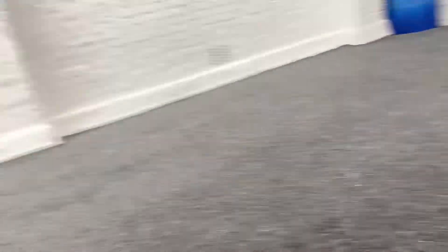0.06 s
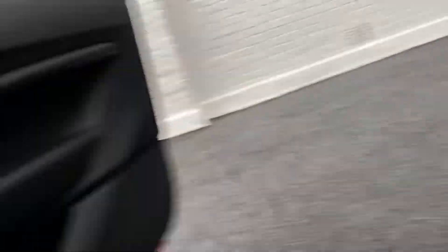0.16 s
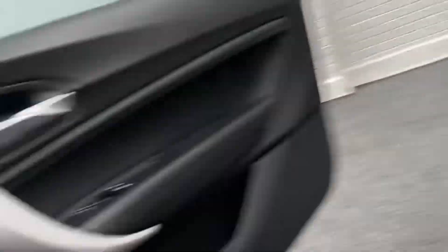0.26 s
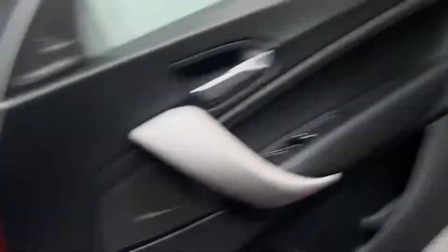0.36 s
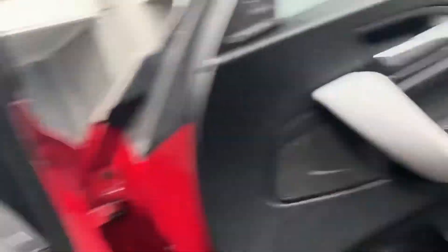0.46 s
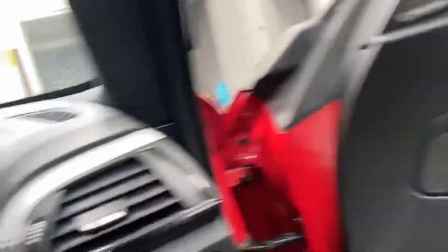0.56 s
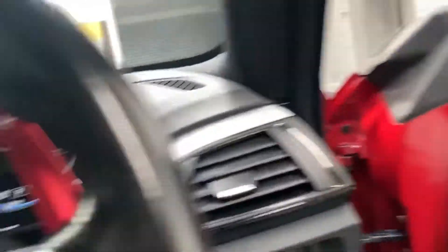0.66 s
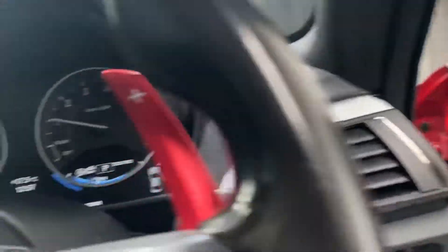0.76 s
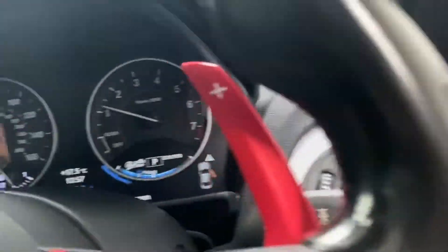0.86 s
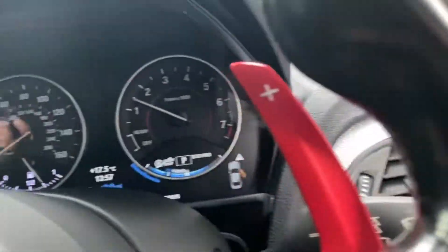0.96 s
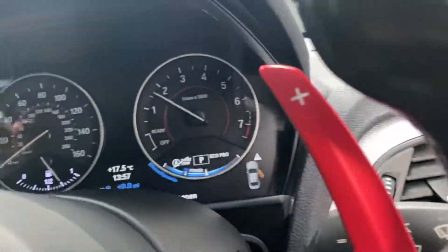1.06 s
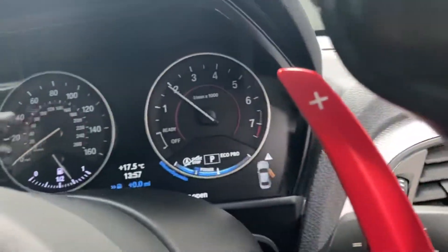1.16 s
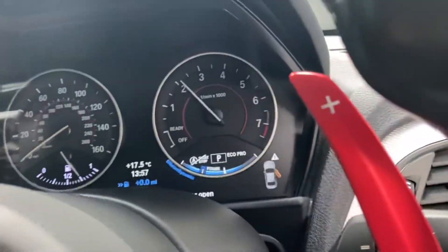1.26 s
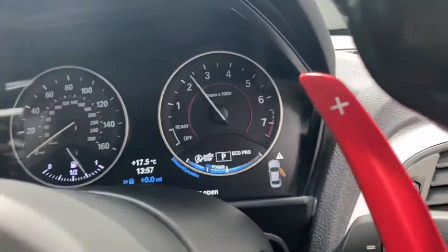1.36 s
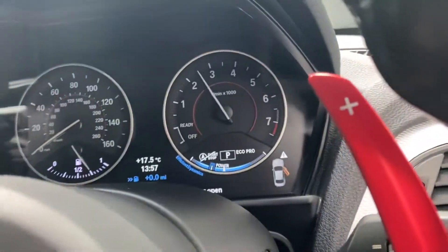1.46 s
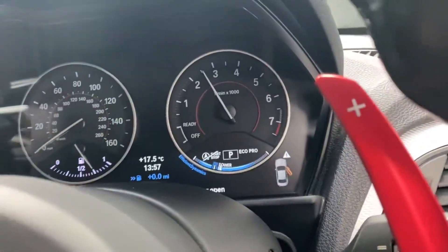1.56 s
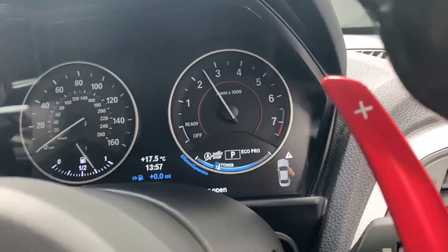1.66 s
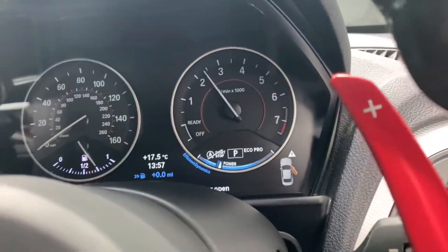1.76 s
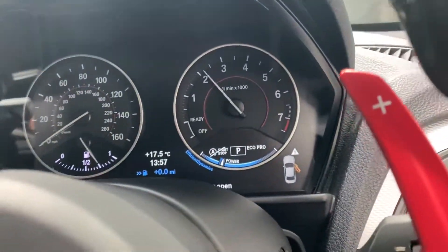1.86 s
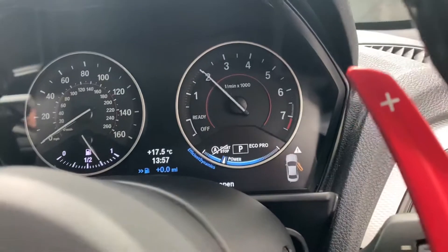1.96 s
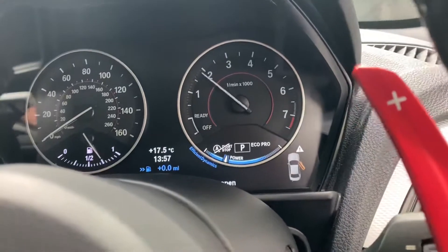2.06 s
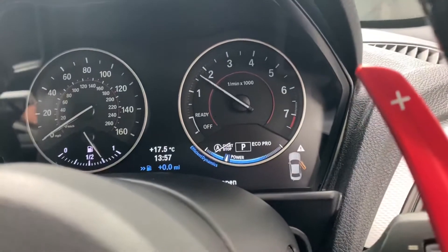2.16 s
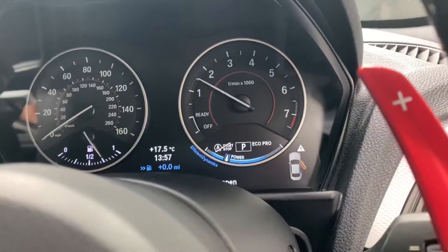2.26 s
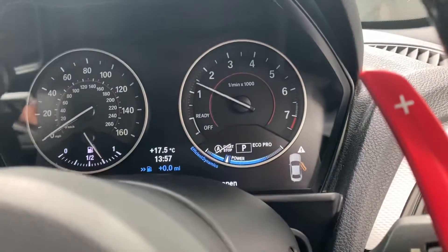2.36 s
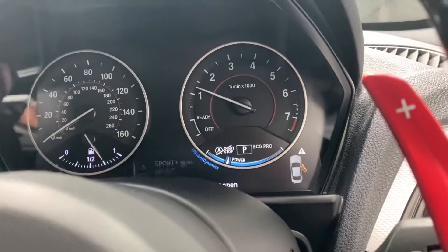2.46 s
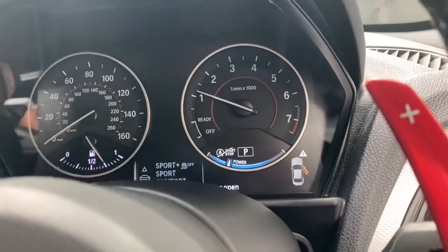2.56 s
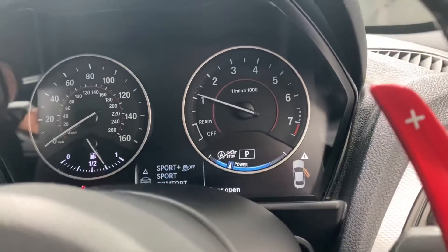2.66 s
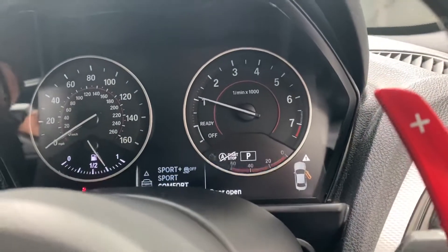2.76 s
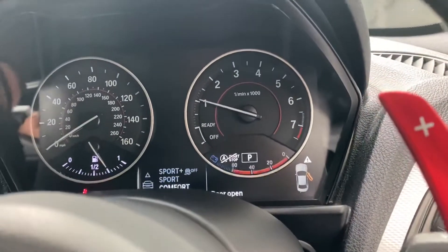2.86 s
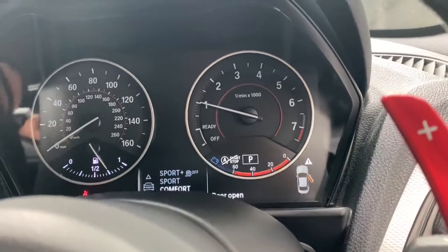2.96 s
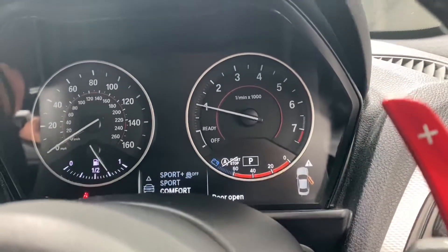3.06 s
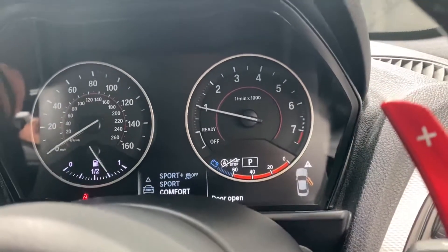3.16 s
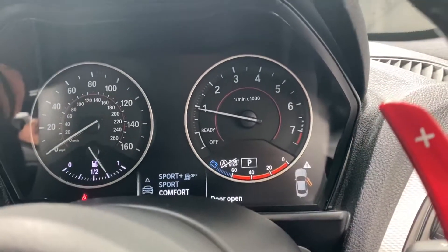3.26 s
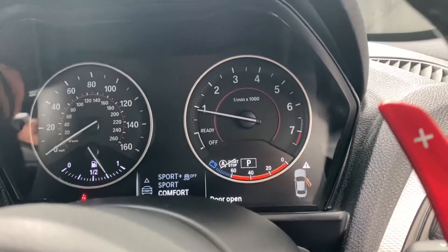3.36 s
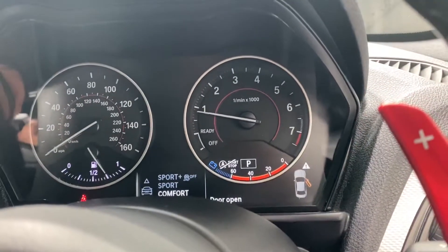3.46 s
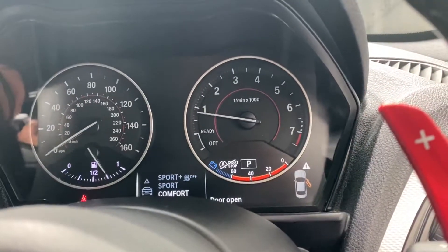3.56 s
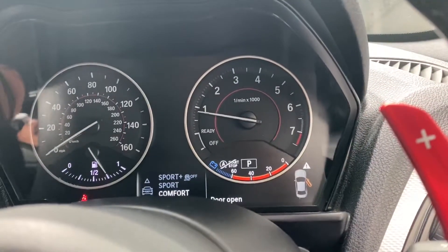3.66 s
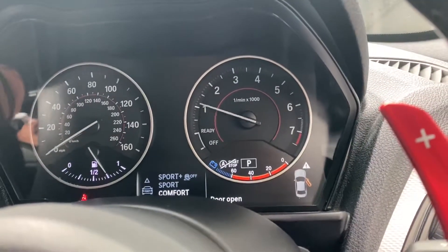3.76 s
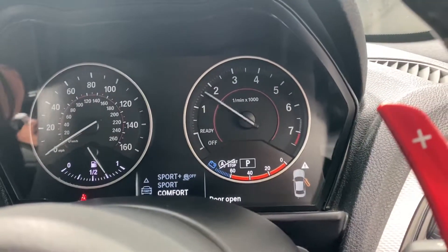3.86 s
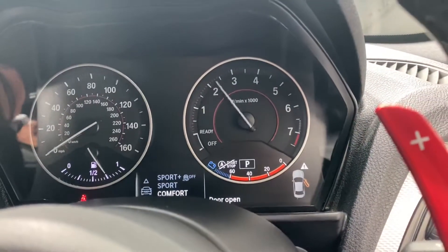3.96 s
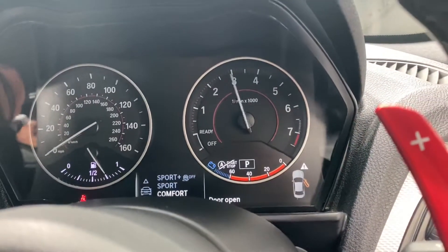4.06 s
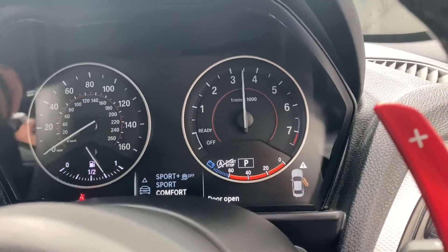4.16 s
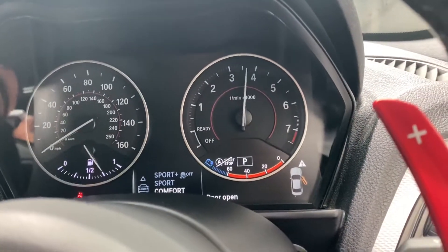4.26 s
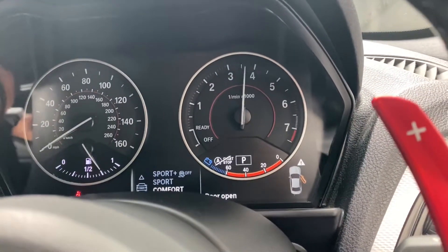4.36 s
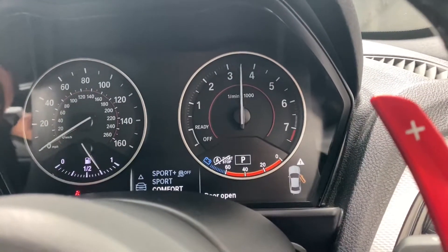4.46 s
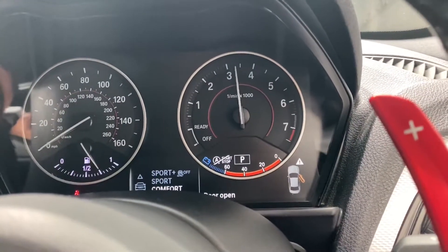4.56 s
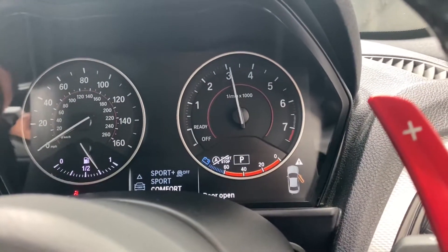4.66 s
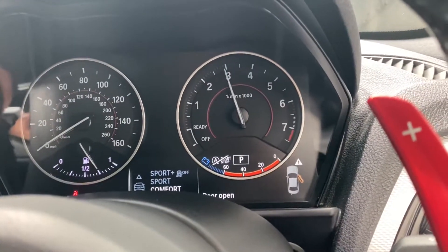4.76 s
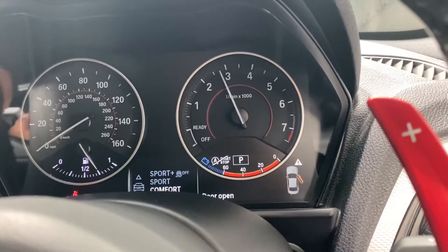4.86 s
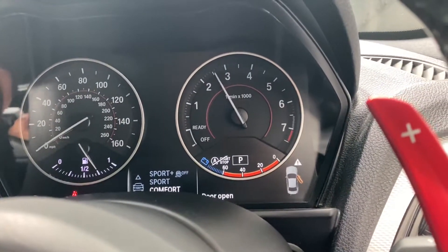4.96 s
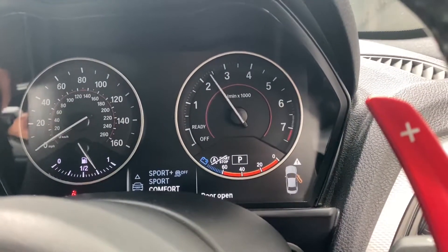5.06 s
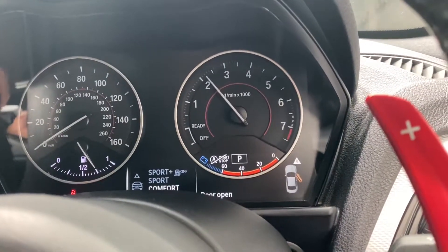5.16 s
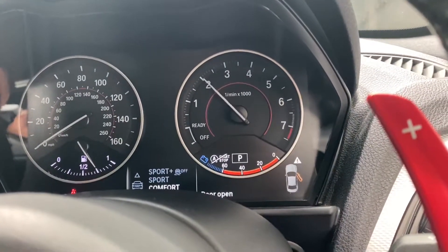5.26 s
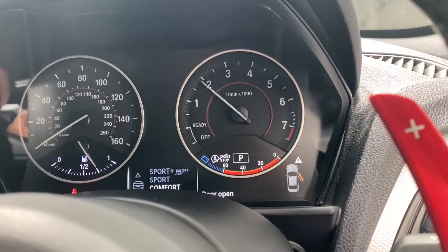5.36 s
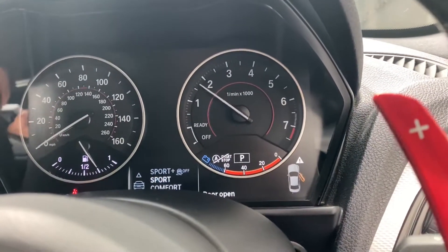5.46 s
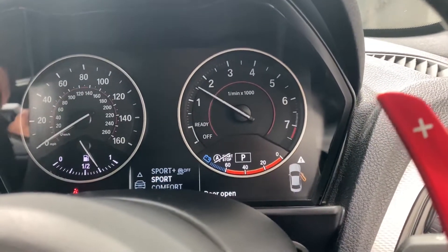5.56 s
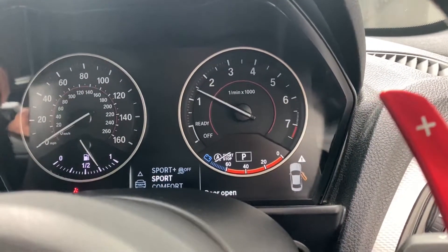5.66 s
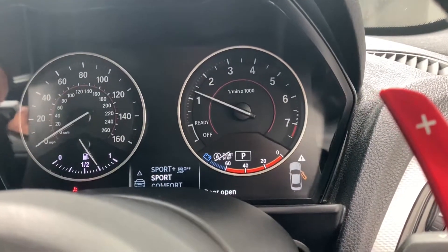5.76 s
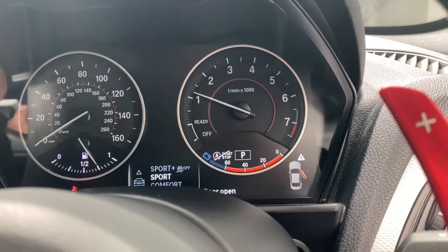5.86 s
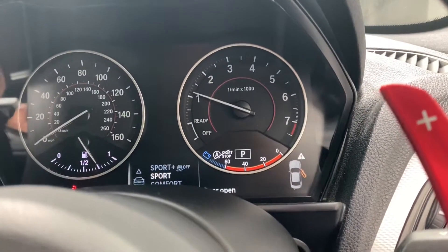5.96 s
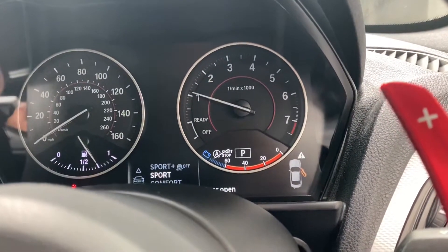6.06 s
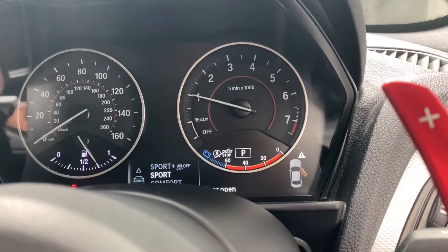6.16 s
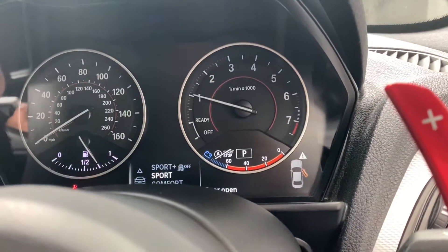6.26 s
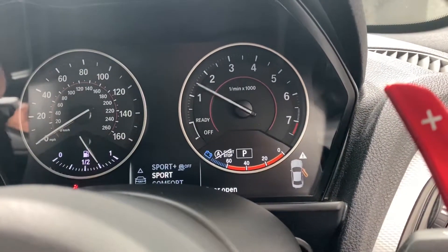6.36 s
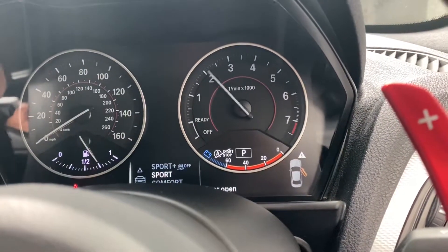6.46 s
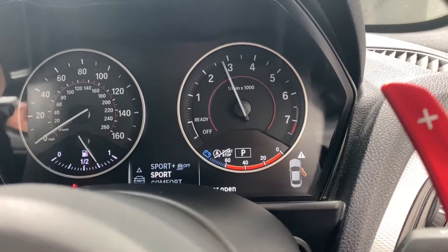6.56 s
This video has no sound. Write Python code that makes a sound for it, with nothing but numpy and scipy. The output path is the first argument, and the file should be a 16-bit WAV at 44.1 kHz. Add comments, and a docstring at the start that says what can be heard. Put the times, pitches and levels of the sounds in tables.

```python
"""A turbocharged six-cylinder car in a hard-walled showroom, heard from the driver's seat with the door open.
It sinks from a rev, swells again and falls back with a whine and a whirr that follow the engine; a switch ticks.
The hardest stab at the pedal brings rasp, hiss and vented air, then unburnt fuel cracks and burbles in the pipe.
A last stab is still climbing at the end. Firing pulses ring a bank of resonances; filtered noise makes the rest,
with echoes from the walls and a steady rumble beneath."""
import sys
import numpy as np
from scipy import signal
from scipy.fft import rfft, irfft, next_fast_len
from scipy.io import wavfile

SR = 44100
rng = np.random.default_rng(int(sys.argv[2]) if len(sys.argv) > 2 else 0)


def transcribe(signal):
    """Save signal, clipped to [-1, 1], as a 16-bit WAV file at the path in sys.argv[1]."""
    frames = np.atleast_2d(signal).T
    limited = np.clip(frames, -1, 1)
    pcm = np.round(limited * 32767).astype(np.int16)
    wavfile.write(sys.argv[1], SR, pcm)


N = 291362
TIME = np.arange(N) / SR  # s

# resonances of exhaust pipe and cabin: centre_hz, width_hz (before widening), relative_level_db
PIPE = [(54.6, 13.4, 6), (82.2, 27.5, 5), (123.6, 33.3, 0.5), (175.1, 24.4, 3.5), (209.2, 13.3, 4),
        (252, 5.6, 0.5), (288.9, 11.6, 5), (326.9, 10.3, 2), (359.4, 12.9, 2.5), (437, 14.5, -5.5),
        (504.5, 16, -1.5), (560.5, 33.4, -3), (682, 80, -5), (746.4, 83, -5.5), (832, 44, -7),
        (916.3, 29, -4)]
# resonances of the rasping tailpipe: centre_hz, width_hz (before widening), relative_level_db
RASP = [(686, 29, -0.5), (734.4, 27, 1.5), (785.6, 45, -6), (920, 41, -8), (1022, 37, -10.5)]
# sound that differs between the ears, against what they share: frequency_hz, level_db
APART = [(100, -2), (400, -4.5), (1000, 1.5), (3000, 5), (9000, 15.5), (13000, -19.5)]

ROAR_DB = -30  # roar at which whirr and hiss have their reference levels
RASP_HZ = 181  # reference speed of rasp and half order, firings per s
RUSH_LAG_S = 0.044  # hiss and rasp build up later than the note


def gain_of(db):
    """Turns decibels into an amplitude factor."""
    return 10 ** (np.asarray(db) / 20)


def evened(x):
    """Scales a signal to rms 1."""
    return x / np.sqrt(np.mean(x ** 2) + 1e-20)


def read(points, hz):
    """Reads a curve drawn over log frequency."""
    f, value = np.transpose(points)
    return np.interp(np.log(hz + 1), np.log(f + 1), value)


def colour(x, points):
    """Filters by a spectrum in dB."""
    size = next_fast_len(x.shape[-1] + 4096)
    gains = gain_of(read(points, np.fft.rfftfreq(size, 1 / SR)))
    return irfft(rfft(x, size) * gains, size)[..., :x.shape[-1]]


def pipe(x, widen, modes=PIPE):
    """Rings a bank of resonances, each applied twice for steep sides."""
    out = np.zeros(len(x))
    for hz, width, db in modes:
        b, a = signal.iirpeak(hz, hz / (width * widen), SR)
        once = signal.lfilter(b, a, x)
        out += gain_of(db) * signal.lfilter(b, a, once)
    return out


def wander(hz):
    """Chance drift below hz, rms 1."""
    slow = signal.butter(2, hz, fs=SR, output="sos")
    return evened(signal.sosfilt(slow, rng.standard_normal(N)))


def whistle(hz, width_hz):
    """Noise in a narrow, steep band that follows the curve hz, rms 1."""
    pole = [1, -np.exp(-2 * np.pi * width_hz / SR)]
    once = signal.lfilter([1], pole, rng.standard_normal((2, N)))
    slow = signal.lfilter([1], pole, once)
    carrier = np.exp(2j * np.pi * np.cumsum(hz) / SR)
    return evened(((slow[0] + 1j * slow[1]) * carrier).real)


def room(x):
    """Sparse echoes of random sign, each band dying at its own speed; one tail is shared, two differ by ear."""
    # decay of the showroom: frequency_hz, t60_s
    decay = [(100, 0.84), (700, 1.08), (2000, 1.75), (5000, 1), (12000, 0.27)]
    # room over direct sound: frequency_hz, level_db
    wet = [(60, -9.5), (300, -2.5), (1000, -2), (3000, -3), (8000, -14), (15000, -5.5)]
    taps = np.zeros((3, SR))
    at = np.arange(300, SR - 20, 20) + rng.integers(0, 20, (3, (SR - 301) // 20))
    np.put_along_axis(taps, at, rng.choice([-1., 1.], at.shape), 1)
    hz, t, z = signal.stft(taps, SR, nperseg=256)
    t60 = read(decay, hz)[:, None]
    # the root keeps the energy of each band independent of its decay
    tail = signal.istft(z * gain_of(-60 * t / t60) / np.sqrt(t60), SR, nperseg=256)[1]
    tail /= np.linalg.norm(tail[0])
    tail = colour(tail[0] + colour(tail[1:], APART), wet)
    return signal.fftconvolve(x[None], tail, axes=1)[:, :N]


def idle_rumble():
    """Steady low noise, part shared and part different at the two ears."""
    # spectrum of the rumble: frequency_hz, relative_level_db (per Hz)
    spectrum = [(15, -35), (25, 1), (80, 3), (280, -2.5), (400, -30), (906, -11), (1480, -26), (1650, -20),
                (12000, -76.5), (15600, -102)]
    shared, apart = rng.standard_normal(N), rng.standard_normal((2, N))
    return gain_of(-45) * evened(colour(shared + colour(apart, APART), spectrum))


def ticks():
    """Short bright clicks of plastic switches in the cabin: dying bursts of noise."""
    # small switch ticks: start_s, level_db (before colouring)
    clicks = [(2.2502, -32), (2.4113, -24), (2.4178, -33), (5.1269, -23)]
    t60_s = 0.037
    out, t = np.zeros(N), np.arange(2000) / SR
    for (s, db), noise in zip(clicks, rng.standard_normal((len(clicks), len(t)))):
        out[round(s * SR):][:len(t)] += gain_of(db - 60 * t / t60_s) * noise
    return colour(out, [(2000, -30), (4000, -10), (11000, -23.5), (15000, -34)])  # Hz, dB


def burble():
    """Small pops of unburnt fuel while the engine slows: impulses at an uneven rate and of uneven strength."""
    # strength of the pops over time: time_s, level_db (before pipe and body)
    strength = [(4.55, -32), (4.66, -13), (4.73, -13.5), (4.79, -28.5), (5.0, -32), (5.1, -14.5),
                (5.17, -34), (5.32, -16.5), (5.42, -43), (5.6, -23.5), (5.8, -43)]
    s, db = np.transpose(strength)
    pop_db = np.interp(TIME, s, db, -150, -150) + 2.5 * rng.standard_normal(N)
    pops_per_s = 50 * gain_of(4 * wander(hz=39.5))
    struck = np.diff(np.floor(np.cumsum(pops_per_s) / SR), prepend=0)
    return gain_of(pop_db) * struck


def backfires():
    """A pressure thump rings pipe and body; the crack arrives later, round the car."""
    # fuel going off in the pipe: start_s, thump_db (before pipe and body), crack_db
    bangs = [(0.189, -25, -66), (0.238, -19.5, -88), (4.183, -21, -43), (4.479, -0.5, -11),
             (4.4933, -10, -17.5), (4.511, -17, -22), (4.692, -16, -31), (4.716, -18.5, -33),
             (4.823, -24, -43), (4.901, -26, -47), (5.065, -16, -50), (5.135, -17, -48), (5.304, -17, -55),
             (5.378, -24.5, -59), (5.568, -18.5, -64)]
    # spectrum of the crack: frequency_hz, relative_level_db (per Hz)
    crack_spectrum = [(290, -12), (500, 5.5), (686, 2), (900, -7), (1200, -3.5), (1580, 0.5), (1930, -16.5),
                      (2250, -6.5), (2580, -15), (2950, -8.5), (4700, -18.5), (5050, -16), (6650, -17.5),
                      (7100, -26), (11700, -31.5), (15600, -45)]
    crack_delay_s, crack_t60_s = .0105, 0.16
    blows, cracks, t = np.zeros(N), np.zeros(N), np.arange(4000) / SR
    fade = gain_of(-60 * t / crack_t60_s)
    noise = rng.standard_normal((len(bangs), len(t)))
    for (s, thump_db, crack_db), row in zip(bangs, noise):
        blows[round(s * SR)] += gain_of(thump_db)
        at = round((s + crack_delay_s) * SR)
        cracks[at:at + len(t)] += gain_of(crack_db) * fade * np.minimum(t / .003, 1) * row
    pops = burble()
    # each small pop spits a little noise
    spit = gain_of(-30) * fade * rng.standard_normal(len(t))
    cracks += signal.oaconvolve(pops, spit)[:N]
    # the cabin flexes at 98 Hz, 1.5 ms after the blow
    surge = -np.sin(2 * np.pi * 98 * (t - .0015)) * gain_of(-60 * t / .055) * (t > .0015)
    u = t / .00025  # time in units of the pressure rise
    ring = pipe((1 - u) * np.exp(-u), widen=4.0, modes=PIPE + RASP)
    puff = 0.66 * u * np.exp(1 - u) + 5.0 * ring
    thumps = signal.oaconvolve(blows + pops, puff) + signal.oaconvolve(blows + 0.049 * pops, surge)
    # thumps are heard through the body
    muffled = signal.sosfilt(signal.butter(2, 1800, fs=SR, output="sos"), thumps[:N])
    return muffled + colour(cracks, crack_spectrum) / np.std(colour(noise, crack_spectrum))


def pedal(t):
    """Decibels that the open throttle adds to boom, growl, hiss and rasp."""
    # stabs at the pedal: press_s, rise_s, lift_s, boom_db, growl_db, hiss_db, rasp_db
    stabs = [(-.5, .1, 0.02, 12, 2, -0.5, 25.5), (.6, 0.098, 1.3, 6, 5.5, 6.5, 2),
             (3.559, 0.085, 4.07, 16, 11, 12.5, 9), (6.139, 0.049, 6.47, 14, 9, 11.5, 8)]
    lift_fade_s = 0.11
    added = 0
    for press, rise, lift, *adds_db in stabs:
        opening = np.minimum((t - press) / rise, 1 - (t - lift) / lift_fade_s)
        added = added + np.outer(adds_db, np.clip(opening, 0, 1))
    return added


def fuel_cut(t):
    """Decibels that the clean note loses while no fuel burns on the overrun."""
    # spells without fuel: start_s, end_s, change_db
    spells = [(1.39, 1.64, -12), (4.44, 5.6, -8)]
    fade_s = .05
    return sum(db * np.clip(np.minimum(t - start, end - t) / fade_s, 0, 1) for start, end, db in spells)


def whirr(roar_db):
    """Steady-textured noise whose level follows the roar."""
    # spectrum of the whirr: frequency_hz, relative_level_db (per Hz)
    spectrum = [(590, -30), (1000, 11), (2280, -2.5), (2530, -7.5), (2990, -9.5), (3880, -17),
                (6000, -14.5), (7800, -61.5)]
    level_db = -41 + 0.98 * (roar_db - ROAR_DB)
    return evened(colour(rng.standard_normal(N), spectrum)) * gain_of(level_db)


def whine():
    """Belt drive whine: a gliding noise band, thin near idle and broad under load."""
    # course of the whine, silent after the last row: time_s, centre_hz, thin_db, broad_db
    course = [(0, 2422, -101, -53), (0.751, 2008, -57.5, -69), (1.249, 2679, -61, -52),
              (2.2, 2408, -65, -62.5), (2.699, 2079, -58.5, -68), (3.049, 1895, -56, -72),
              (3.251, 1817, -76, -82), (3.601, 1757, -69, -78)]
    s, centre_hz, thin_db, broad_db = np.transpose(course)
    hz = np.interp(TIME, s, centre_hz)
    thin = whistle(hz, width_hz=110) * gain_of(np.interp(TIME, s, thin_db, right=-150))
    broad = whistle(hz, width_hz=450) * gain_of(np.interp(TIME, s, broad_db, right=-150))
    return thin + broad


def vent():
    """Air vented as the turbo slows: a falling band of noise."""
    # course of the vented air: time_s, centre_hz, level_db
    course = [(4.104, 7190, -57), (4.299, 6449, -50), (4.468, 6000, -45), (4.701, 5577, -56)]
    s, hz, db = np.transpose(course)
    return whistle(np.interp(TIME, s, hz), width_hz=350) * gain_of(np.interp(TIME, s, db, -150, -150))


def hiss(puffs, roar_db):
    """Turbulent gas puffs coloured to a hiss that follows the roar and the open throttle."""
    # spectrum of the hiss: frequency_hz, relative_level_db (per Hz)
    spectrum = [(590, -22), (1080, -2.5), (1290, -2.5), (1500, -37), (2290, -18.5), (3080, -17),
                (4300, -23.5), (5500, -20.5), (6220, -18), (7390, -28), (10800, -33.5), (15600, -55.5)]
    level_db = -52 + 0.84 * (roar_db - ROAR_DB) + pedal(TIME - RUSH_LAG_S)[2]
    return evened(colour(puffs, spectrum)) * gain_of(level_db + 0.64 * wander(hz=6.6))


def muffle(x, filt=signal.sosfilt):
    """The silencer: keeps what lies below 420 Hz."""
    return filt(signal.butter(4, 420, fs=SR, output="sos"), x)


def uneven_roar(hz, firings, puffs, roar_db):
    """Firings of unequal strength and gas puffs ring the pipe, and the tailpipe rasps more as speed climbs."""
    even_hz, even_db = 270, 58  # speed, or added boom, at which the firings are fully even
    fill_s = .05  # the roar in the pipe trails the gas flow
    keep = np.exp(-1 / (fill_s * SR))
    filled_db = roar_db[0] + signal.lfilter([1 - keep], [1, -keep], roar_db - roar_db[0])
    # rasp against the roar: -8.5 dB at RASP_HZ, 11 dB more for each doubling of speed
    rasp_db = filled_db - 8.5 + 11 * np.log2(hz / RASP_HZ)
    rasp_db += pedal(TIME - RUSH_LAG_S)[3] + fuel_cut(TIME) / 2
    fired = np.diff(np.floor(firings), prepend=0) * rng.standard_normal(N)
    kicks = evened(signal.lfilter([1], [1, -.85], fired) / np.sqrt(hz))
    drive = 0.61 * kicks + 0.98 * evened(puffs)
    # at speed and under load the firings even out, so their roughness leaves the bass
    evenness = np.clip(hz / even_hz + pedal(TIME)[0] / even_db, 0, 1)
    drive -= evenness * muffle(drive, signal.sosfiltfilt)
    high_orders = sum(np.cos(2 * np.pi * k * firings) for k in range(4, 9))
    roar = evened(pipe(drive, widen=1.57)) * gain_of(filled_db + 2 * wander(hz=23.2))
    rasp = evened(pipe(drive + 0.93 * high_orders, widen=1.06, modes=RASP))
    return roar + rasp * gain_of(rasp_db + 2 * wander(hz=30))


def exhaust_note(hz, firings):
    """Equal firings give a boom and its orders; small cylinder differences give weak half orders."""
    # boom by speed with the pedal up: firings_per_s, level_db (before the pipe)
    boom_curve = [(40, -44), (53, -39.5), (88, -31), (115, -35), (145, -31), (175, -21)]
    # growl by speed with the pedal up: firings_per_s, level_db (before silencer and pipe)
    growl_curve = [(40, -44), (50, -45.5), (65, -36), (90, -26.5), (115, -26), (150, -25), (180, -17.5)]
    growl_lead_s = 0.043  # the growl catches before the boom
    boom_db = read(boom_curve, hz) + pedal(TIME)[0] + fuel_cut(TIME)
    growl_db = read(growl_curve, hz) + pedal(TIME + growl_lead_s)[1] + fuel_cut(TIME)
    orders = sum(np.cos(2 * np.pi * k * firings) * k ** -0.29 for k in range(2, 7))
    halves = sum(np.cos(np.pi * k * firings) for k in range(3, 9, 2))
    # the lowest half order grows with speed
    lowest_half = (hz / RASP_HZ) ** 2 * np.cos(np.pi * firings)
    boom = gain_of(boom_db + 3.1 * wander(hz=15.4)) * np.cos(2 * np.pi * firings)
    growl = gain_of(growl_db) * (orders + gain_of(-15.5) * halves + gain_of(-15.5) * lowest_half)
    return 0.74 * boom + pipe(0.37 * boom + muffle(growl), widen=1.44)


def engine():
    """One count of firings drives the clean exhaust note and the noisy parts, which are returned apart."""
    # the engine through the scene: time_s, firings_per_s, roar_db
    course = [(0.0, 71.5, -27), (0.111, 67, -38), (0.41, 48, -45.5), (0.62, 53, -51.5), (0.97, 89, -35),
              (1.27, 122, -37.5), (1.501, 120, -33), (1.7, 107, -31), (2.02, 88.3, -33.5),
              (2.51, 54.4, -42.5), (2.99, 43, -53.5), (3.52, 46.4, -55.5), (3.625, 61, -38.5),
              (3.69, 89, -21.5), (3.75, 85, -19.5), (3.86, 119.3, -20), (3.94, 140, -14.5),
              (4.0, 158.6, -20.5), (4.06, 171, -30.5), (4.15, 175, -25.5), (4.46, 158, -23.5),
              (4.62, 135.5, -27), (4.72, 136.5, -25), (4.95, 120.5, -26.5), (5.55, 77, -34.5),
              (5.75, 59, -41), (6.14, 43.4, -47), (6.18, 62.2, -36), (6.225, 82, -24.5), (6.31, 95, -22),
              (6.4, 123, -22), (6.48, 162, -18), (6.6, 193, -20.5)]
    s, *columns = np.transpose(course)
    hz, roar_db = (np.interp(TIME, s, c) for c in columns)
    # running count of firings, with a slightly unsteady speed
    firings = np.cumsum(hz * (1 + .012 * wander(hz=29.98))) / SR
    # each firing drags a puff of turbulent gas behind it
    puffs = (1.7 + np.exp(-(firings % 1) / 0.077)) * rng.standard_normal(N)
    noise = uneven_roar(hz, firings, puffs, roar_db) + hiss(puffs, roar_db)
    noise += whirr(roar_db) + whine() + vent()
    return exhaust_note(hz, firings), noise


def scene():
    """Car, room, idle rumble and ticks, as they reach the two ears."""
    fades_per_s = 5  # how fast the noise fades from one set of echoes to the next
    note, noise = engine()
    car = noise + backfires()
    # the noise fades between three sets of echoes, so no fixed pitch stands out in the room
    turn = np.pi * fades_per_s / 3 * TIME
    echoes = sum(room(np.sqrt(2 / 3) * np.cos(turn + k * np.pi / 3) * car) for k in range(3))
    return note + car + echoes + room(.35 * note) + idle_rumble() + ticks()


def record(dry):
    """Two channels: below the top treble the left is later and a little duller; loud peaks are rounded."""
    # balance of the two channels: frequency_hz, left_minus_right_db
    balance = [(60, 0.5), (180, -2.5), (550, -3), (1650, -4.5), (4970, -5.5), (15000, -2)]
    lag_s, edge_hz = 19 / SR, 15720
    size = next_fast_len(N + 4096)
    hz = np.fft.rfftfreq(size, 1 / SR)
    lean = gain_of(read(balance, hz) / 2)
    left, right = rfft(dry, size) * np.array([lean * np.exp(-2j * np.pi * hz * lag_s), 1 / lean])
    # lag and level difference fade out from 9.5 to 11 kHz; above that both channels are the same
    same = np.clip((hz - 9500) / 1500, 0, 1)
    heard = irfft([left + same * (right - left), right], size)[:, :N]
    # peaks overload softly
    rounded = np.sign(heard) * (.7 + .2 * np.tanh((abs(heard) - .7) / .2))
    heard = np.where(abs(heard) < .7, heard, rounded)
    heard = heard * np.minimum(np.arange(N)[::-1] / (.004 * SR), 1)  # ends without a click
    band_limit = signal.firwin(511, edge_hz, window=("kaiser", 9), fs=SR)
    return signal.oaconvolve(heard, band_limit[None], "same")


dry = scene()
out = record(dry)
transcribe(out)
```